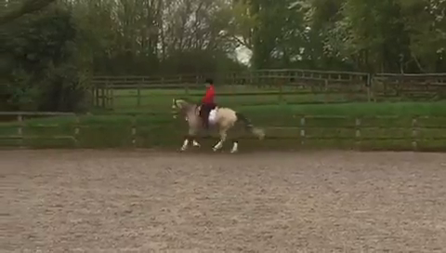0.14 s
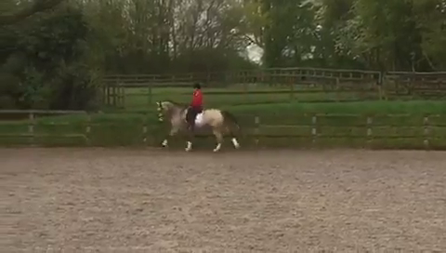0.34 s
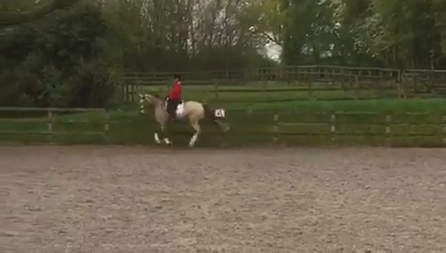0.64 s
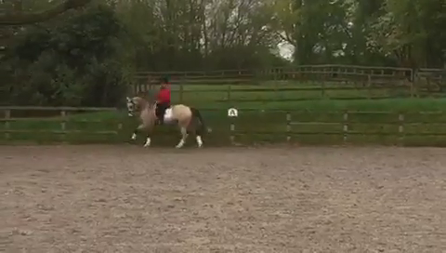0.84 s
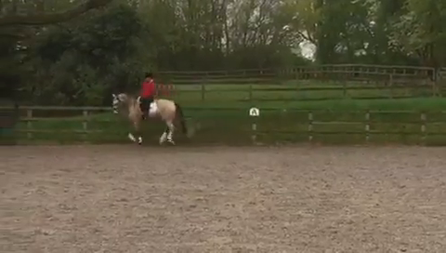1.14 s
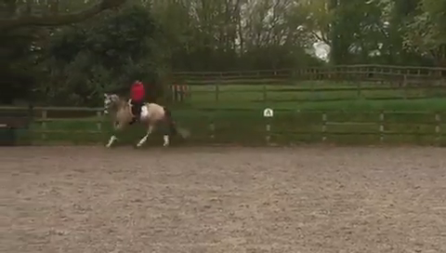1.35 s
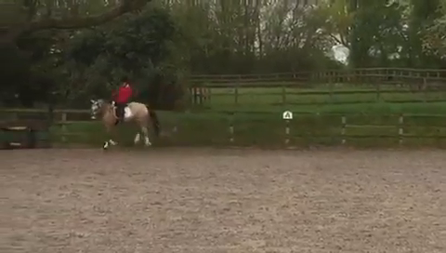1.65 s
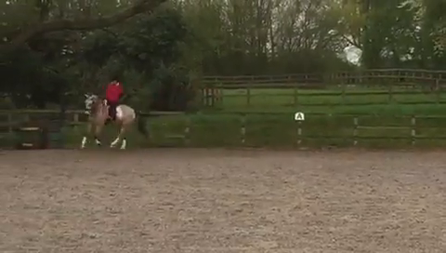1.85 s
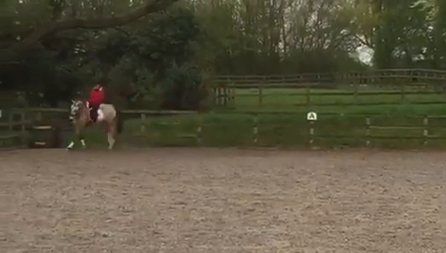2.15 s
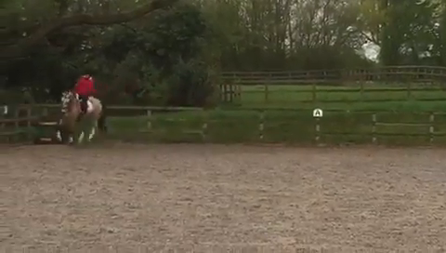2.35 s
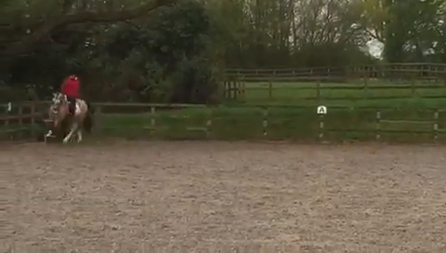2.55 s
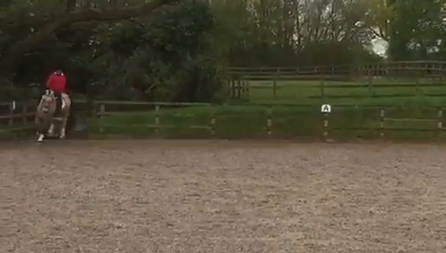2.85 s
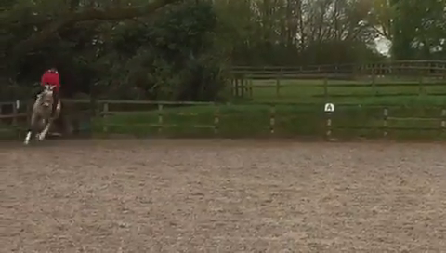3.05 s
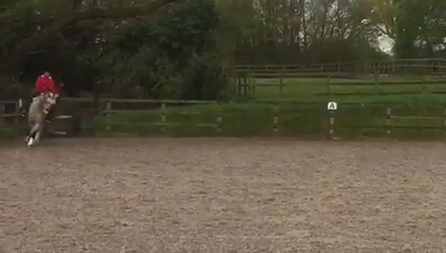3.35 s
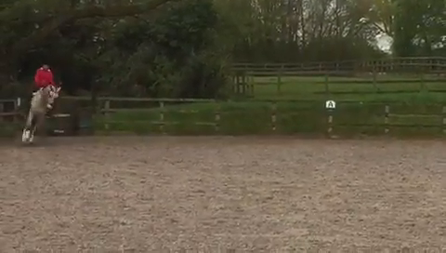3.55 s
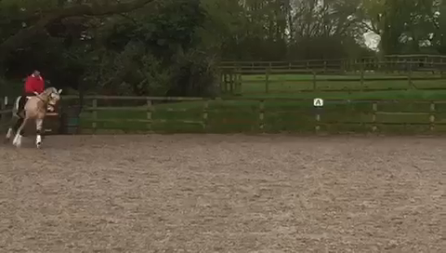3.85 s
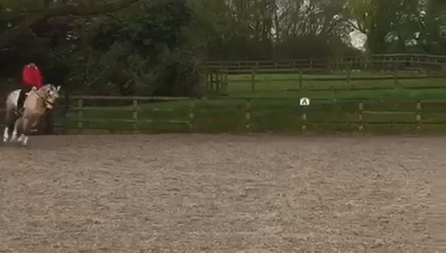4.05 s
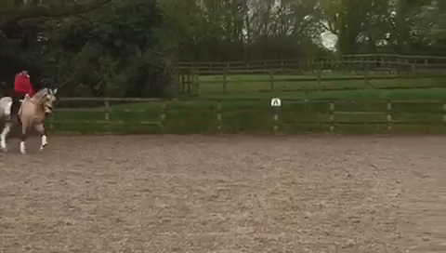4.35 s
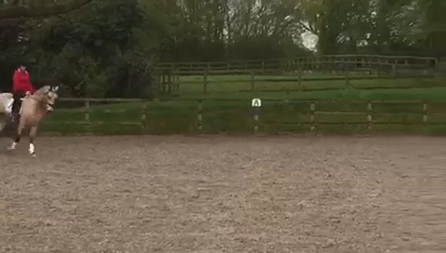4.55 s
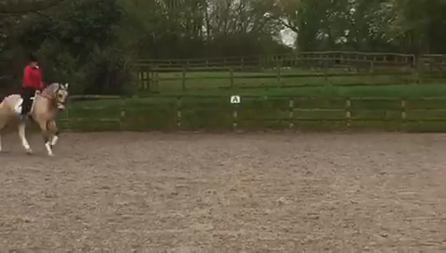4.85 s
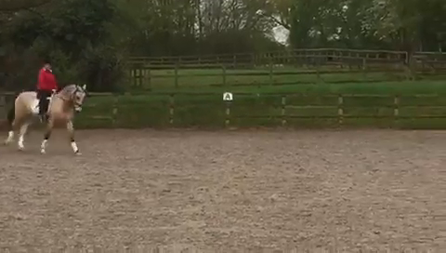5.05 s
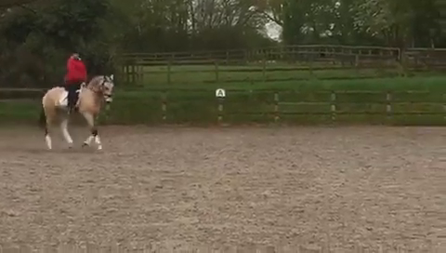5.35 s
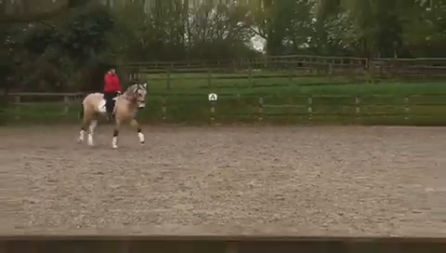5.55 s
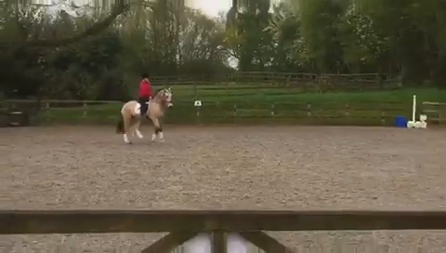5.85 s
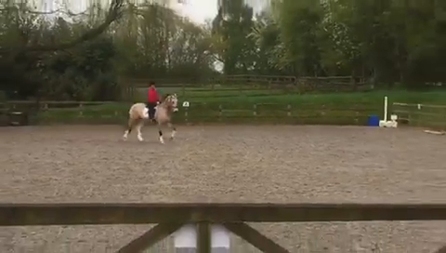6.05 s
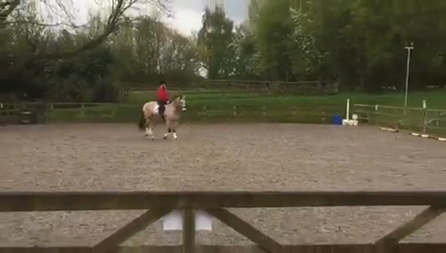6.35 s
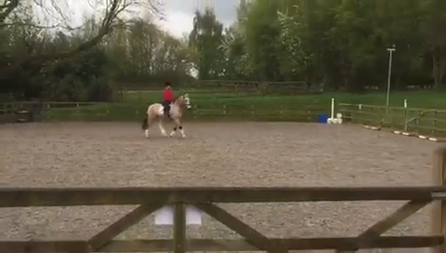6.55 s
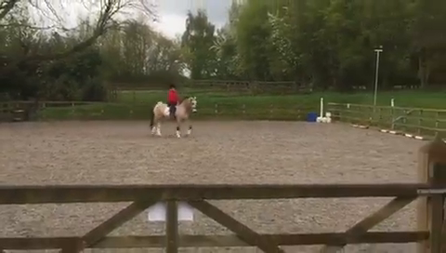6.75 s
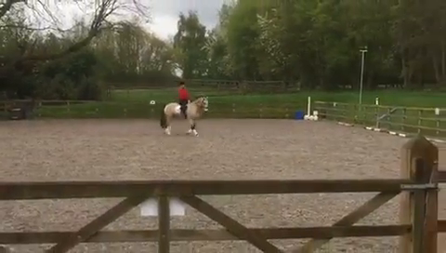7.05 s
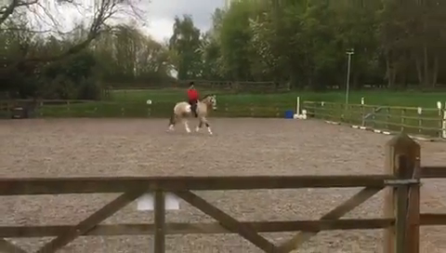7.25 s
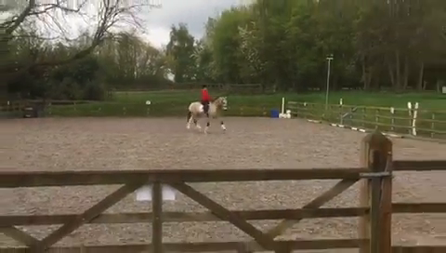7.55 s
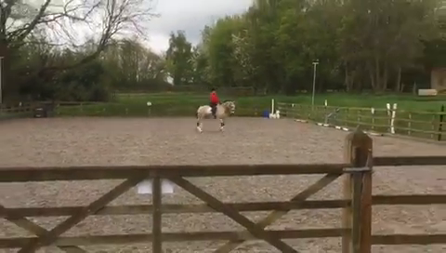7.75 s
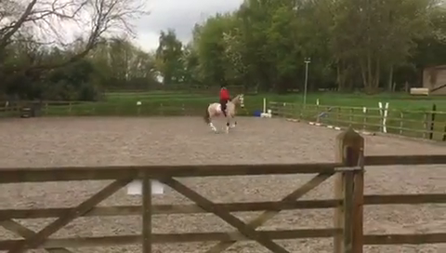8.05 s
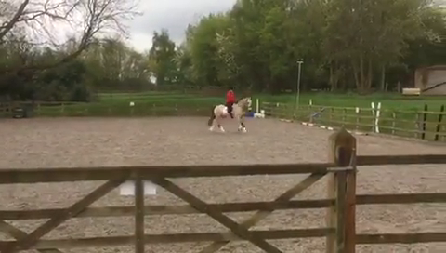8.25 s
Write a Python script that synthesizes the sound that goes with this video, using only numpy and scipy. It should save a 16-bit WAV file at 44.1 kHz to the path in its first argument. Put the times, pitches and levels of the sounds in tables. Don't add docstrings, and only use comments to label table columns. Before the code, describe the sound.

An open sand arena among trees, heard through one small microphone with a quiet airy floor and soft, swelling traffic rumble. From 0 to 2.5 seconds a nearby warbler sings a loud, fast, fluty phrase of glides, falling strokes and short whistles around 2 to 5 kHz, with a leafy echo. Beneath it a horse's hooves crunch softly in sand, in close pairs about every 0.55 seconds, with dull low thuds. From 2.6 to 4 seconds birds are thin and faint and the hooves clearer, strongest near 4. A crisp snap comes at 4.3, a hard click at 5.2. Distant birds answer from 4: five steady chirps from 4.6 to 5.2, long faint buzzes, then busier whistles and quick pulses from 6 to the end at about 8.4. Regular crunches stop around 6.3; scattered thuds continue, one heavy at 7.9. A dove coos very faintly, mostly after 7.

```python
import sys
import numpy as np
from scipy import signal
from scipy.fft import rfft, irfft, next_fast_len
from scipy.io import wavfile
from scipy.ndimage import uniform_filter1d

SR = 44100
rng = np.random.default_rng(int(sys.argv[2]) if len(sys.argv) > 2 else 0)


def undo_db(level):
    steps = np.asarray(level, float) / 20
    return 10 ** steps


def bounce(signal):
    frames = np.transpose(np.atleast_2d(signal))
    limited = np.clip(frames, -1, 1)
    pcm = np.round(limited * 32767).astype(np.int16)
    wavfile.write(sys.argv[1], SR, pcm)


N = 370881

# frequency in Hz, level in dB per Hz.
AIR_SPECTRUM = [(26, -6.5), (60, 3), (170, -2), (237, -12.5), (553, -19), (5500, -27.5), (11300, -37),
                (12300, -47.5)]
# time in seconds, level in dB.
TRAFFIC_SWELL = [(0.1, -71), (0.85, -54.5), (1.6, -53), (2.35, -60), (3.099, -59.5), (3.85, -63),
                 (4.6, -52), (5.351, -63), (6.1, -54), (6.85, -61), (7.6, -58.5), (8.35, -59.5)]

STRAIGHT = [(0, 0), (1, 1)]
STROKE = [(0, 0.022), (0.349, .55), (.7, .92), (1, 0.97)]
SCOOP = [(0, 0.32), (.17, 0.41), (.4, .85), (1, 1)]
DROOP = [(0, 0), (0.598, .25), (1, 0.94)]
ARCH = [(0, 0.0023), (.25, 0.674), (.48, 1), (.75, 0.616), (1, 0)]
WARBLE = [(0, 0), (.2, -.12), (.4, 0.73), (.58, -.25), (.78, 0.53), (1, 0.93)]
HUMP = [(0, 0.02), (0.201, .75), (.36, 0.89), (.7, .72), (1, 0.85)]

# start in seconds, length in seconds, first Hz, second Hz, level in dB.
NEAR_STROKES = [ (.338, 0.018, 7300, 4650, -69), (1.088, 0.034, 4900, 2780, -55),
                (.078, 0.03, 3830, 3070, -49.5), (.122, 0.0316, 2950, 2193, -43.5),
                (.18, 0.016, 5300, 4400, -58.5), (.24, 0.04, 4530, 3210, -51.5),
                (.365, 0.023, 4930, 4270, -60), (.42, 0.045, 4420, 3050, -44.5),
                (.514, .026, 5850, 4200, -40.5), (.6, 0.046, 4600, 2970, -46.5),
                (.705, 0.019, 6500, 3440, -58.5), (.725, 0.0305, 4900, 4320, -53),
                (.775, .03, 4600, 3750, -42), (.888, 0.014, 6360, 3580, -55.5),
                (.908, 0.022, 5700, 4300, -53), (.965, 0.025, 4600, 3440, -43),
                (1.855, 0.038, 3203, 2055, -56)]
NEAR_SCOOPS = [
    (.765, 0.049, 3600, 3620, -38.5),
    (.805, 0.023, 3620, 2995, -44),
    (1.185, 0.0565, 2690, 2350, -42),
    (1.617, 0.042, 4310, 3910, -48),
    (1.642, 0.0327, 3183, 3510, -37.5),
    (2.047, 0.037, 2510, 3020, -40.5),
    (2.32, 0.056, 2454, 3030, -45),
    (.635, 0.044, 2340, 2094, -47),
]
NEAR_GLIDES = [ (.025, 0.0328, 6420, 5740, -39.5), (.11, 0.013, 5200, 5600, -58),
               (.397, 0.028, 4275, 4600, -41), (.417, 0.04, 4740, 4930, -38.5),
               (0, 0.075, 3870, 3800, -53.5), (.54, 0.0088, 4170, 4750, -61), (.83, 0.025, 3140, 2983, -36),
               (1.4, 0.071, 2766, 3022, -38.5), (1.463, 0.043, 3010, 2200, -42.5),
               (1.503, 0.014, 2180, 2154, -50), (1.528, 0.012, 2140, 2160, -53),
               (1.305, 0.013, 3130, 3340, -44), (1.965, 0.025, 5840, 5730, -73),
               (2.083, 0.069, 3030, 3166, -38.5), (.596, 0.038, 2416, 2368, -44),
               (.91, 0.05, 3133, 3510, -39.5), (1.122, 0.015, 3190, 3740, -43),
               (1.125, 0.054, 1802, 2700, -46), (1.175, 0.014, 2730, 2650, -34),
               (1.38, 0.015, 4850, 5750, -58), (1.385, 0.011, 4184, 4210, -42),
               (1.476, 0.013, 3100, 3570, -44), (1.596, 0.011, 4100, 7300, -65),
               (1.677, 0.024, 3483, 2650, -37), (1.7, 0.048, 2628, 2702, -39),
               (1.906, 0.059, 3986, 3525, -38), (1.975, 0.027, 3900, 3820, -47),
               (2.427, 0.04, 2898, 2983, -46), (2.483, 0.015, 2947, 2950, -45.5),
               (2.565, 0.016, 2895, 2990, -56.5)]
NEAR_DROOPS = [
    (.21, 0.052, 3480, 2596, -39.5),
    (.965, 0.043, 3370, 2920, -44),
    (1.74, 0.043, 3540, 2600, -56),
    (0.9, .017, 4450, 4300, -51),
]
NEAR_HUMPS = [
    (1.823, 0.0772, 2650, 3600, -40.5),
    (1.69, 0.046, 2900, 4900, -64),
]
NEAR_ARCHES = [
    (.265, .05, 2610, 2840, -38),
    (1.275, .045, 3530, 3030, -42.5),
    (2.0, 0.028, 3670, 4380, -48.5),
    (2.375, 0.044, 2870, 2400, -44),
]
NEAR_WARBLES = [
    (1.066, 0.039, 4470, 2700, -48),
    (1.238, 0.034, 4070, 2820, -48),
    (1.412, 0.044, 3990, 2805, -49.5),
]
# start in seconds, length in seconds, centre Hz, level in dB.
BUZZES = [
    (0, 0.048, 4290, -52.5),
    (1.597, 0.039, 5360, -62.5),
    (1.68, 0.041, 4870, -61.5),
    (5.938, 0.062, 5940, -63),
    (5.081, 0.41, 5430, -71.5),
    (5.747, 0.54, 5000, -69.5),
    (6.42, 0.072, 4180, -75),
    (7.798, 0.083, 4660, -63.5),
    (8.258, 0.02, 5060, -57.5),
]
# offset in seconds, length in seconds, first Hz, second Hz, level in dB.
PULSE_BUZZ = [(.003, 0.025, 7700, 7460, -60.5)]

# start in seconds, peak level in dB, ground ring in
# Hz.
THUDS = [(0.032, -38, 173), (0.456, -39, 160.5), (0.559, -40.5, 93), (0.997, -39.5, 81.5),
         (1.148, -41.5, 160.6), (1.277, -46, 84.5), (1.429, -49, 99), (2.201, -48, 88.6), (2.392, -44, 97),
         (2.594, -48, 69.2), (2.725, -45.5, 152), (2.842, -37.5, 101), (3.441, -44, 67.3), (3.901, -43, 83),
         (4.049, -33.5, 170), (4.485, -38.5, 95), (4.617, -41, 157), (4.79, -46, 149), (5.048, -35.5, 95.4),
         (5.38, -48.5, 83), (5.495, -45, 94.2), (5.618, -46, 82), (5.698, -50, 62.3), (6.009, -39, 99),
         (6.312, -44, 96), (6.783, -46, 87.5), (6.955, -53.5, 98), (7.169, -46.5, 115), (7.471, -49.5, 99),
         (7.869, -29.5, 171), (8.229, -47, 115),
         (2.85, -42, 189),
    (4.018, -42, 91.5),
    (4.95, -41.5, 161),
    (5.057, -38, 196),
    (7.87, -37, 89.6),
]
# time of the loudest moment in seconds, level in dB.
HOOVES = [(0.042, -47), (0.585, -48.5), (0.625, -53), (1.14, -49.5), (1.187, -52), (1.695, -46),
          (1.737, -46), (2.272, -49.5), (2.315, -46.5), (2.848, -49), (2.893, -49), (3.438, -46),
          (3.455, -55), (3.471, -54), (3.478, -46.5), (3.504, -72), (4.012, -42.5), (4.044, -51),
          (4.054, -42.5), (4.598, -47.5), (4.642, -53), (4.572, -66), (5.159, -60), (5.171, -45.5),
          (5.219, -47), (5.712, -56), (5.722, -47.5), (5.765, -47.5), (6.281, -56), (6.339, -54),
          (8.243, -63.5)]
# frequency in Hz, level in dB per Hz.
SAND_SPECTRUM = [(300, -28.5), (750, -13.5), (1250, -2), (2100, -5), (3300, -17), (4400, -27.5),
                 (6800, -49), (12000, -48)]

# start in seconds, length in seconds, pitch in Hz, level in dB.
RASPS = [(.245, 0.024, 4010, -52.5), (0.46, 0.014, 5000, -56), (.772, .03, 4300, -54),
         (.962, 0.024, 4250, -50), (1.972, 0.038, 4330, -62.5), (6.385, 0.066, 4500, -59),
         (7.571, 0.072, 6800, -66), (6.69, 0.14, 6640, -66), (7.05, 0.1, 3395, -63),
         (3.04, 0.059, 5250, -76), (3.15, 0.091, 7130, -75.5), (3.39, 0.13, 7190, -75.5)]
# offset in seconds, length in seconds, first Hz, second Hz, level in dB.
CHIRP_BUZZ = [(0.012, 0.044, 5080, 5440, -68.5), (.03, 0.041, 6070, 6280, -71)]
# start in seconds, length in seconds, first Hz, top Hz, level in dB.
COOS = [
    (7.02, .07, 447, 470, -71),
    (7.35, .05, 482, 500, -73),
    (7.56, 0.24, 458.6, 512, -78),
    (1.1, 0.4, 489.5, 529, -75.5),
    (1.83, 0.088, 469, 539, -71.5),
    (4.15, 0.12, 395, 446, -70),
    (7.13, 0.17, 370, 454, -70.5),
    (7.89, 0.19, 357, 463, -70),
    (8.27, 0.15, 459, 487, -74),
]
# start in seconds, peak level in dB, low Hz, high Hz, decay in ms.
TICKS = [(5.1672, -25, 587, 3620, 0.86), (5.168, -31.5, 660, 1430, 2.6), (4.2767, -35.5, 5120, 12100, 5.9),
         (1.602, -48.5, 520, 874, 3.3), (3.236, -52, 800, 3800, 1.5), (4.193, -54, 4020, 9700, 0.93),
         (4.504, -53, 4000, 11000, 0.98), (6.146, -51.5, 5200, 8850, 4.6), (7.155, -54, 4060, 9500, 1.4),
         (7.598, -49, 3800, 6500, 1.5), (8.225, -55, 4000, 9100, 1.5)]

# start in seconds, length in seconds, first Hz, second Hz, level in dB.
FAR_SCOOPS = [ (4.06, 0.03, 4200, 4060, -60), (4.12, .07, 4060, 4080, -76), (4.17, 0.036, 2110, 2745, -57),
              (5.285, 0.075, 2430, 2640, -59), (5.33, 0.066, 4020, 4380, -62.5),
              (5.33, 0.045, 7860, 8200, -71), (6.71, 0.054, 3540, 4010, -71),
              (5.33, 0.069, 5820, 5890, -60.5), (6.02, 0.14, 6920, 7020, -63.5),
              (6.09, 0.038, 5980, 5340, -58.5), (6.235, .03, 3780, 3670, -73),
              (6.854, 0.063, 5570, 4940, -57.5), (7.03, .11, 2700, 3484, -55.5),
              (7.03, 0.12, 3030, 3798, -51), (7.063, 0.029, 4080, 4230, -55),
              (7.634, 0.013, 6980, 7310, -59), (7.747, 0.018, 3510, 5110, -58),
              (7.765, 0.034, 7400, 7740, -59.5), (7.914, 0.14, 3426, 3764, -53)]
FAR_FADING = [ (2.73, 0.018, 2930, 2945, -61), (3.01, 0.04, 2590, 2510, -72),
              (3.16, 0.068, 2180, 2070, -75), (3.64, 0.25, 6840, 6840, -72.5),
              (3.89, 0.046, 5000, 4660, -68.5), (4.205, 0.032, 2730, 2700, -52.5),
              (4.238, 0.027, 2710, 2130, -57), (5.5, .13, 7450, 8100, -73),
              (5.562, 0.029, 3160, 3220, -47.5), (5.602, 0.076, 3220, 3300, -67),
              (5.59, 0.067, 1910, 1530, -67), (5.754, 0.091, 5520, 5550, -55),
              (5.86, 0.14, 5560, 5570, -67), (6.08, 0.011, 4250, 5900, -65), (6.2, 0.023, 5100, 3780, -61),
              (6.11, 0.093, 6020, 5880, -64), (6.076, 0.013, 4040, 3970, -61),
              (6.1, 0.044, 3470, 3410, -68), (5.78, .03, 6300, 6140, -70), (5.872, .02, 6700, 5300, -76),
              (6.3, 0.035, 3660, 3600, -61), (7.04, 0.043, 7600, 7750, -78), (7.1, 0.071, 7750, 7500, -72),
              (7.768, 0.035, 5050, 5080, -60), (7.88, 0.12, 2970, 2520, -74),
              (7.97, 0.063, 1830, 1905, -71), (6.37, 0.045, 3370, 3800, -65),
              (6.685, 0.065, 6630, 6730, -61), (6.733, 0.034, 7100, 7230, -56),
              (6.8, 0.057, 4460, 4870, -63), (6.84, 0.072, 2620, 3260, -69.5),
              (6.955, 0.087, 2580, 2590, -63), (7.61, 0.036, 6180, 6170, -66),
              (8.05, 0.059, 3880, 3800, -62), (8.12, 0.096, 5990, 5560, -74),
              (8.23, 0.022, 4890, 4830, -65), (8.24, 0.016, 3140, 3670, -57), (8.3, 0.074, 2490, 2590, -64)]
FAR_SWELLING = [ (4.29, 0.055, 2620, 2690, -61), (5.655, 0.032, 6100, 3700, -67),
                (5.535, .027, 2730, 3197, -55), (5.7, 0.049, 5230, 5220, -63),
                (5.94, 0.0089, 4950, 4830, -62), (6.07, 0.019, 6300, 6170, -62),
                (6.335, 0.043, 1506, 4110, -55), (7.12, 0.012, 6300, 7040, -66),
                (7.755, 0.018, 4300, 5530, -57), (6.19, 0.014, 3520, 3610, -60.5),
                (6.265, 0.025, 3790, 2280, -56), (6.275, 0.0065, 4400, 3030, -46.5),
                (6.68, 0.033, 7500, 5770, -56.5), (6.82, 0.014, 3760, 2800, -64),
                (6.955, 0.077, 2640, 3130, -56.5), (7.795, 0.021, 7520, 3420, -55.5),
                (7.82, 0.066, 3560, 3600, -58), (7.878, 0.03, 3700, 3340, -57),
                (8.262, 0.015, 6380, 3030, -55.5), (8.372, 0.036, 3410, 3375, -49)]
FAR_DROOPS = [
    (6.135, .065, 5280, 5040, -63),
    (6.92, 0.064, 5000, 7240, -63),
]
FAR_ARCHES = [
    (2.66, .04, 5700, 5770, -68),
    (2.7, 0.0586, 5690, 5830, -63.5),
    (4.36, 0.031, 3140, 3480, -64),
    (4.74, 0.053, 1737, 2300, -54.5),
    (4.895, 0.047, 1810, 2234, -54),
    (6.26, 0.079, 1270, 1053, -60),
    (6.555, 0.055, 6030, 6500, -64),
    (6.565, 0.0233, 2145, 3000, -52),
    (7.56, 0.041, 6440, 6980, -67),
]
FAR_WARBLES = [
    (4.405, 0.027, 2840, 2280, -53),
    (4.438, 0.059, 2500, 1794, -54.5),
]
FAR_FAINT = [ (2.77, 0.1, 5800, 5750, -81), (2.8, .075, 3920, 3880, -76), (2.96, 0.02, 2950, 2800, -72),
             (3.062, 0.042, 2620, 2250, -70), (3.13, .03, 2560, 2500, -71.5), (3.245, .03, 2280, 2230, -71),
             (3.02, .04, 6520, 6480, -76), (3.47, 0.032, 5420, 5380, -72), (4.262, 0.019, 2090, 2050, -55),
             (4.335, 0.032, 2750, 3100, -60), (6.72, .05, 5850, 6000, -64),
             (6.88, 0.086, 6000, 6020, -67.5), (6.83, .018, 6500, 7200, -68), (6.98, .05, 7150, 7250, -77),
             (7.16, .12, 3720, 3700, -69), (7.715, 0.024, 6500, 7250, -72), (7.749, 0.011, 3580, 6200, -57),
             (7.797, 0.013, 6050, 5950, -67), (8.228, 0.017, 2450, 2380, -69),
             (6.6, 0.046, 5850, 5800, -68)]
# offset in seconds, length in seconds, first Hz, second Hz, level in dB.
CHIRP = [(-.022, .02, 5250, 5130, -70), (0, .032, 4810, 6900, -63.5), (.032, 0.036, 6760, 6700, -70)]
DOT_AND_FLICK = [(0, 0.014, 5250, 5040, -65.5), (.028, .022, 5077, 5930, -63)]
PULSE = [(.004, 0.024, 4105, 4330, -58.5)]

# first start in seconds, period in seconds.
CHIRPS_S, DOTS_S, PULSES_S = (4.645, 0.13), (6.776, 0.147), (7.167, 0.08)


def rms_one(x):
    return x / np.sqrt(np.mean(x ** 2))


def band(x, low_hz, high_hz):
    return signal.sosfilt(signal.butter(2, [low_hz, high_hz], "band", fs=SR, output="sos"), x)


def drift(rate_hz):
    r = np.exp(-2 * np.pi * rate_hz / SR)
    wander = signal.lfilter([1], [1, -2 * r, r * r], rng.standard_normal(N + SR))
    return rms_one(wander[SR:])


def coloured(white, spectrum):
    hz, db = np.transpose(spectrum)
    size = next_fast_len(N)
    log_hz = np.log(np.arange(size // 2 + 1) * SR / size + 1)
    gain = undo_db(np.interp(log_hz, np.log(hz), db))
    return rms_one(irfft(rfft(white, size) * gain, size)[:N])


def sung(rows, shape, swell_db):
    notes = []
    for s, length, first, second, db in rows:
        levels = (db - swell_db / 2, db + swell_db / 2)
        points = [(s + part * length, first + way * (second - first)) for part, way in shape]
        notes.append([levels, *points])
    return notes


def level_notes(rows):
    return [(s, length, hz, hz, db) for s, length, hz, db in rows]


def repeated(notes, first_s, period_s, count):
    return [(first_s + period_s * k + s, *rest) for k in range(count) for s, *rest in notes]


def path(notes, overtone_db, fade_s, waver_hz, rate_hz):
    out = np.zeros(N + SR)
    waver = np.pad(waver_hz * drift(rate_hz), (0, SR))
    for (start_db, end_db), *points in notes:
        s, hz = np.transpose(points)
        t = np.arange(s[0] - fade_s, s[-1] + fade_s, 1 / SR)
        t = t[t >= 0]
        at = int(t[0] * SR)
        pitch = uniform_filter1d(np.interp(t, s, hz), size=130) + waver[at:at + len(t)]
        phase = 2 * np.pi * np.cumsum(pitch) / SR
        inside = np.minimum(t - s[0], s[-1] - t) / fade_s
        edge = np.sin(np.pi / 4 * np.clip(inside + 1, 0, 2)) ** 2
        tone = np.sin(phase) + undo_db(overtone_db) * (np.sin(2 * phase) + 0.42 * np.sin(3 * phase))
        level = np.sqrt(2) * undo_db(np.interp(t, s[[0, -1]], [start_db, end_db]))
        out[at:at + len(t)] += level * edge * tone
    return out[:N]


def trees(x, early_db, early_s, late_db, t60_s):
    t = np.arange(SR) / SR
    uneven = undo_db(3.96 * np.minimum(rng.exponential(1, SR), 5))
    early = rng.standard_normal(SR) * uneven * np.exp(-t / early_s)
    late = rng.standard_normal(SR) * undo_db(-60 * t / t60_s) * (1 - np.exp(-t / 0.007))
    echo = (undo_db(early_db) * rms_one(early) + undo_db(late_db) * rms_one(late)) / np.sqrt(SR)
    echo = signal.sosfilt(signal.butter(2, 2100, "high", fs=SR, output="sos"), echo)
    return x + signal.fftconvolve(x, echo)[:N]


def air():
    floor = coloured(rng.standard_normal(N), AIR_SPECTRUM)
    low = signal.sosfilt(signal.butter(2, 230, fs=SR, output="sos"), floor)
    hum = rms_one(band(low, 81.0, 90.7))
    rumble = rms_one(low) * undo_db(4.37 * drift(10.4)) + undo_db(-10.5) * hum
    swell_db = np.interp(np.arange(N) / SR, *np.transpose(TRAFFIC_SWELL))
    air_db = -61 + 1.34 + 0.5 * drift(5.4)
    return undo_db(air_db) * (floor - low) + undo_db(swell_db - 3.5) * rumble


def near_warbler():
    song = sung(NEAR_SCOOPS, SCOOP, swell_db=3.0)
    song += sung(NEAR_GLIDES, STRAIGHT, swell_db=3.5)
    song += sung(NEAR_DROOPS, DROOP, swell_db=5.0)
    song += sung(NEAR_ARCHES, ARCH, swell_db=-5.0)
    song += sung(NEAR_WARBLES, WARBLE, swell_db=9.5)
    song += sung(NEAR_HUMPS, HUMP, swell_db=13.5)
    fluty = path(song, -37.5, 0.0043, waver_hz=36.6, rate_hz=76) * undo_db(-2 + 2.3 * drift(83))
    falls = path(sung(NEAR_STROKES, STROKE, swell_db=-2.0), -41, 0.0043, waver_hz=75, rate_hz=260)
    return fluty + falls * undo_db(-2.5 + 3.26 * drift(140))


def buzzy_chirps():
    rows = level_notes(BUZZES) + repeated(PULSE_BUZZ, *PULSES_S, count=4)
    return path(sung(rows, STRAIGHT, swell_db=-3.0), -53, 0.012, waver_hz=795, rate_hz=393)


def thuds():
    rise_cycles, fall_cycles = 0.59, 1.9
    out, t = np.zeros(N + SR), np.arange(SR // 4) / SR
    for s, db, hz in THUDS:
        rise = 1 - np.exp(-(t * hz / rise_cycles) ** 2)
        swell = rise * np.exp(-t * hz / fall_cycles)
        ring = swell / swell.max() * np.sin(2 * np.pi * hz * t)
        out[int(s * SR):][:len(t)] += undo_db(db - 3.0) * ring
    return out[:N]


def strokes(rows, rise_s, fall_s):
    clicks = np.zeros(N)
    for s, db in rows:
        clicks[int(s * SR)] = undo_db(db)
    t = np.arange(-SR // 4, SR // 4 + 1) / SR
    shape = np.where(t < 0, np.exp(-(t / rise_s) ** 2), np.exp(-np.abs(t) / fall_s))
    return signal.fftconvolve(clicks, shape, "same")


def hooves():
    white = rng.standard_normal(N)
    grains = white * undo_db(3.3 * np.minimum(rng.exponential(1, N), 5))
    crush = strokes(HOOVES, 0.0069, 0.0074)
    trickle = undo_db(-17.5) * strokes(HOOVES, 0.028, 0.05)
    packed = undo_db(-15.5) * rms_one(band(grains, 1017, 1450))
    spray = undo_db(-21.5) * rms_one(band(white, 5000, 7600))
    grit = undo_db(-3.0 + 2.64 * drift(120)) * (coloured(grains, SAND_SPECTRUM) + packed)
    return trees((crush + trickle) * (grit + spray), -10.5, 0.017, -12.0, 0.44)


def hoarse_notes():
    rows = level_notes(RASPS) + repeated(CHIRP_BUZZ, *CHIRPS_S, count=5)
    return path(sung(rows, STRAIGHT, swell_db=-4.5), -49, 0.008, waver_hz=330, rate_hz=300)


def dove():
    return path(sung(COOS, ARCH, swell_db=-6.5), -28, 0.0152, waver_hz=22, rate_hz=23)


def ticks():
    out, t = np.zeros(N), np.arange(SR // 20) / SR
    for s, db, low_hz, high_hz, decay_ms in TICKS:
        burst = rng.standard_normal(len(t)) * np.exp(-t / decay_ms * 1000)
        snap = band(band(burst, low_hz, high_hz), low_hz, high_hz)
        out[int(s * SR):][:len(t)] += undo_db(db) * snap / np.abs(snap).max()
    return out


def far_answers():
    notes = sung(FAR_SCOOPS, SCOOP, swell_db=-5.0)
    notes += sung(FAR_FADING, STRAIGHT, swell_db=-4.5)
    notes += sung(FAR_SWELLING, STRAIGHT, swell_db=11.0)
    notes += sung(FAR_DROOPS, DROOP, swell_db=-13.0)
    notes += sung(FAR_ARCHES, ARCH, swell_db=-2.0)
    notes += sung(FAR_WARBLES, WARBLE, swell_db=-14.0)
    notes += sung(FAR_FAINT, STRAIGHT, swell_db=-1.5)
    figures = repeated(CHIRP, *CHIRPS_S, count=5)
    figures += repeated(DOT_AND_FLICK, *DOTS_S, count=7)
    figures += repeated(PULSE, *PULSES_S, count=4)
    notes += sung(figures, STRAIGHT, swell_db=-1.5)
    return path(notes, -45, 0.005, waver_hz=46.0, rate_hz=113) * undo_db(-3 + 2.26 * drift(80))


def scene():
    near = trees(near_warbler() + hoarse_notes(), -7.5, 0.039, -8.5, 0.88)
    far = trees(buzzy_chirps() + dove() + far_answers(), -2.4, 0.032, -11.0, 0.9)
    return (air() + near + far + thuds() + hooves() + ticks())[None]


def top_cut(x):
    return signal.sosfilt(signal.butter(12, 12210, fs=SR, output="sos"), x)


def record(dry):
    heard = signal.sosfilt(signal.butter(3, 38, "high", fs=SR, output="sos"), dry)
    return top_cut(heard)


dry = scene()
out = record(dry)
bounce(out)
```